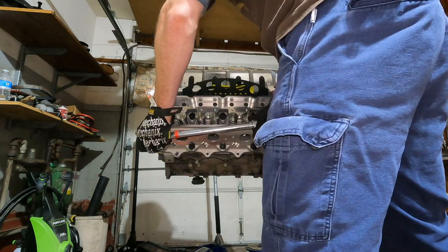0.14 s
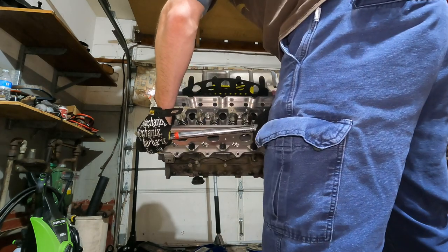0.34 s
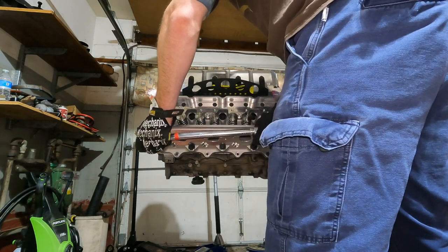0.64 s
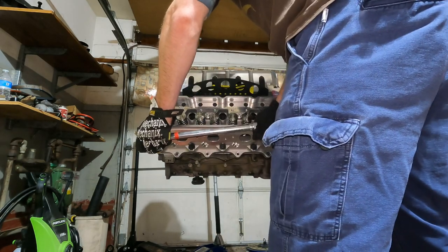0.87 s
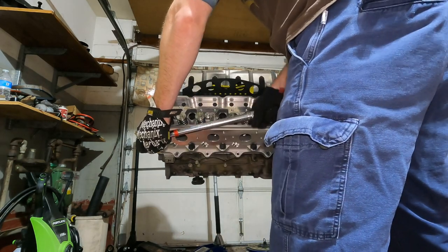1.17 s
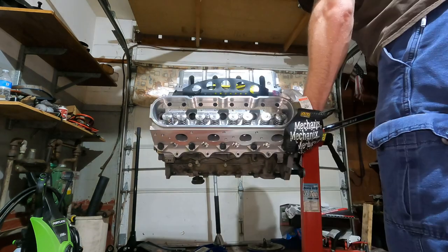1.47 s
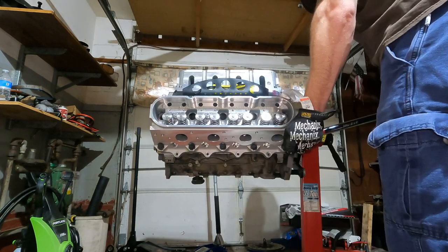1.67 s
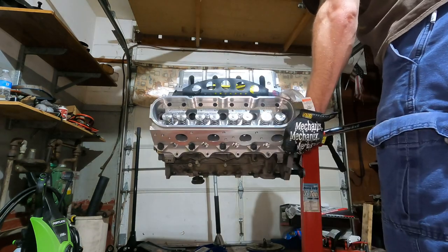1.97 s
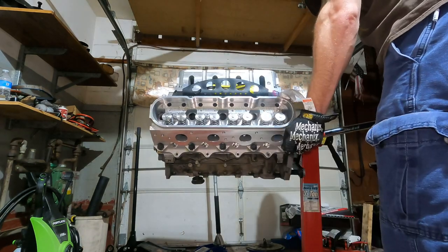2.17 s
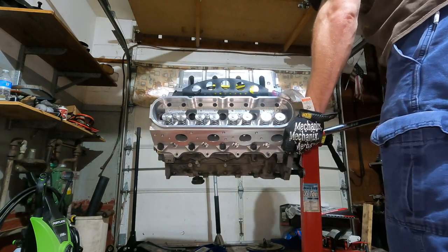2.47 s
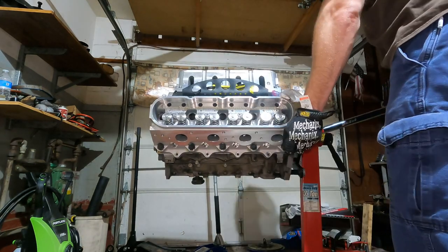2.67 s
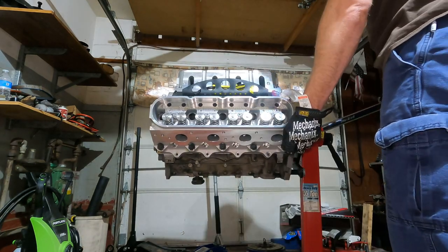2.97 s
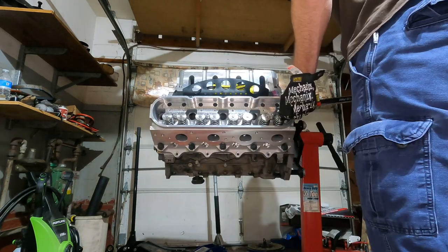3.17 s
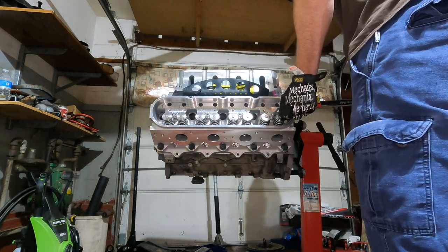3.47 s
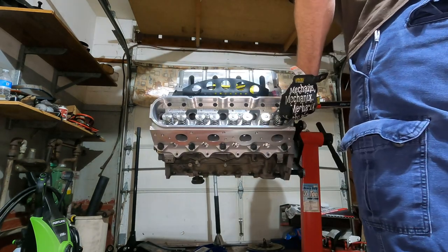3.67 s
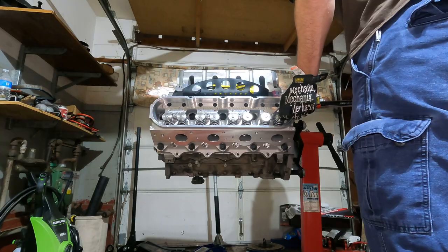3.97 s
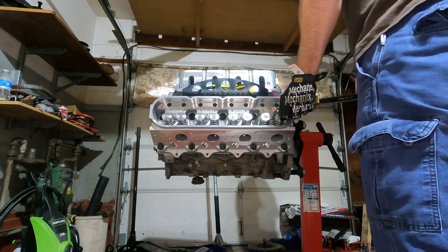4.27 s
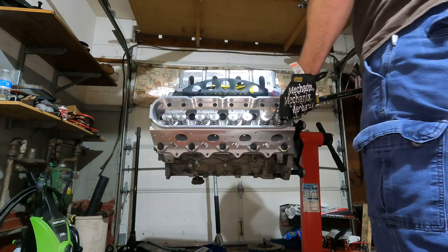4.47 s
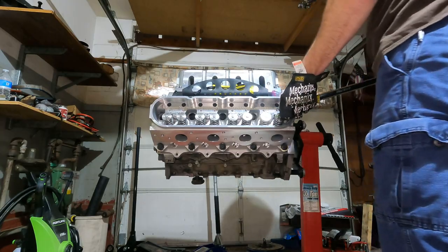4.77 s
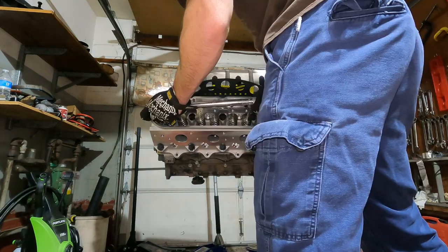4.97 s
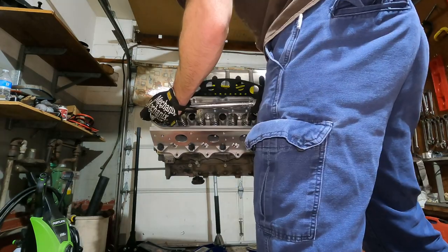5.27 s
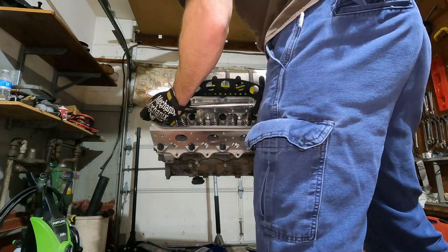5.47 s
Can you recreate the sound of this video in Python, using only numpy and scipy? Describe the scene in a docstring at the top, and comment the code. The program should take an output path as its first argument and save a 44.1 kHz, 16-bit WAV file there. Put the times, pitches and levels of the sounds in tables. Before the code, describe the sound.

Seven very loud, hard steel snaps from a torque wrench, alternating between long-ringing breaks and short, dead returns, with quiet gaps between. Near the end a loose socket ticks faintly, then knocks once more clearly. Dense short garage reflections follow each snap; the recorder squashes the start of the tails. Soft room noise and faint hum continue throughout, nearly mono.

```python
"""A click-type torque wrench tightens head bolts on an engine in a small garage.
At each bolt it breaks over with a loud snap, then snaps back as the pull is eased: noisy contact plus damped modes.
Long modes of tube, bolt and engine ring on; the loose socket knocks; soft room noise, hum and whine lie beneath.
The garage answers with dense reflections; the recorder adds faint pre-echoes of each snap,
and its limiter flattens the start of each tail."""
import sys
import numpy as np
from scipy import signal
from scipy.fft import rfft, irfft
from scipy.io import wavfile

SR = 44100
rng = np.random.default_rng(int(sys.argv[2]) if len(sys.argv) > 2 else 0)


def bounce(signal):
    """Save signal as a 16-bit WAV file at the path given by the first command-line argument."""
    frames = np.transpose(np.atleast_2d(signal))
    limited = np.clip(frames, -1, 1)
    pcm = np.round(limited * 32767).astype(np.int16)
    wavfile.write(sys.argv[1], SR, pcm)


N = 247842

# Snaps. Each row: start in seconds, stroke, direct level in dB (relative), socket note in Hz,
# tube and bolt ring in dB (relative).
SNAPS = [(0.4593, "break", 1.5, 4240, -1), (0.8682, "back", 1.5, 3620, -9), (2.0087, "break", 0.5, 4260, 1),
         (2.4463, "back", 1, 4390, 4), (3.556, "break", -1.5, 4210, 3), (4.0795, "back", -0.5, 4300, 0),
         (5.3301, "break", 2, 4280, 0)]
# By stroke: contact tilt in dB per octave; breaking over under load rings long, snapping back is brighter, deader.
CONTACT_TILT_DB_PER_OCTAVE = {"break": -0.2, "back": 0.33}
# By stroke: socket note in dB.
SOCKET_NOTE_DB = {"break": -8.5, "back": -13}
# By stroke: offset of the tube modes in dB.
TUBE_OFFSET_DB = {"break": -2.5, "back": -29}
# By stroke: offset of the bolt modes in dB.
BOLT_OFFSET_DB = {"break": -1, "back": -14}
# By stroke: later pre-echo in dB relative to the snap.
PRE_ECHO_REL_DB = {"break": -23, "back": -29}
# Socket knocks as it is lifted off the bolt. Each row: start in seconds, level in dB.
SOCKET_KNOCKS = [(4.762, -29), (4.817, -23), (4.8255, -22), (4.8291, -9.5)]
# Quickly damped ratchet head modes. Each row: frequency in Hz, T60 in seconds, relative level in dB
# breaking over, the same snapping back.
HEAD_MODES = [(1080, 0.035, -26.5, -19.5), (1587, 0.023, -25, -12.5), (1860, 0.022, -14, -15),
              (2019, 0.049, -12.5, -17), (2230, 0.014, -9, -24.5), (2850, 0.039, -16, -16),
              (3220, 0.013, -15, -9.5), (3595, 0.01, -15.5, -11.5), (4160, 0.04, -14.5, -12),
              (4450, 0.011, -15, -7), (4690, 0.022, -11, -8.5), (5230, .02, -17.5, -17.5),
              (6860, .012, -17, -18.5), (10160, .018, -16.5, -16.5), (11450, 0.021, -16.5, -26.5)]
# Steel tube modes. Each row: frequency in Hz, T60 in seconds, relative level in dB.
TUBE_MODES = [(3822, .95, -35), (4673, 0.8, -38), (5197, 0.75, -28), (5351, 2.3, -40.5)]
# Bolt modes. Each row: frequency in Hz, T60 in seconds, relative level in dB.
BOLT_MODES = [(4250, .55, -26), (4264, 1.1, -36)]
# Engine modes. Each row: frequency in Hz, T60 in seconds, relative level in dB.
ENGINE_MODES = [(742, .75, -42), (757, 0.65, -38.5), (885, 0.83, -43), (1420, .6, -43), (3850, 0.45, -28),
                (9630, 0.3, -37.5)]
# Steel-on-steel contact spectrum. Each row: frequency in Hz, gain in dB.
CONTACT_SPECTRUM = [(30, -41), (120, -21.5), (350, -14.5), (800, -19), (1300, -8), (1900, -1), (3200, 0.5),
                    (4700, -2.5), (5700, -11), (7200, -9), (8800, -23), (11000, -15), (13500, -27),
                    (16000, -42.5)]
# Garage decay. Each row: frequency in Hz, T60 in seconds.
GARAGE_DECAY = [(150, 0.12), (400, 0.39), (750, 0.58), (2000, 0.45), (4500, 0.42), (7500, 0.36),
                (13000, 0.27)]
# Garage colour. Each row: frequency in Hz, gain in dB.
GARAGE_COLOUR = [(60, -8.5), (300, 2), (700, 3.5), (1100, -2.5), (3000, -0.5), (5000, 0.5), (7500, -0.5),
                 (10500, -5.5), (13500, -6.5), (15000, -25)]
# Room noise spectrum. Each row: frequency in Hz, relative density in dB per Hz.
AIR_SPECTRUM = [(20, -23.5), (55, -14), (100, -15.5), (170, -6), (260, -8.5), (550, -12), (800, -13.5),
                (1500, -16.5), (3000, -22), (5500, -29), (7200, -35), (9000, -49.5), (10000, -46.5),
                (12500, -50), (14500, -72.5)]
# Faint hum and whine. Each row: frequency in Hz, rms level in dB before the waver.
AIR_TONES = [(160, -71), (8020, -92)]
# Stereo difference relative to the mid signal. Each row: frequency in Hz, level in dB.
SIDE_SPECTRUM = [(100, -23.5), (500, -27), (1200, -50.5), (2400, -39), (4000, -42), (8000, -35),
                 (10000, -19), (13000, -1)]


def gain_of(db):
    """Decibels to amplitude."""
    return 10 ** (np.asarray(db) / 20)


def evened(x):
    """Scales to rms 1."""
    return x / np.sqrt(np.mean(x ** 2) + 1e-20)


def read(points, hz):
    """Interpolates a table on a log-frequency axis."""
    point_hz, value = np.transpose(points)
    return np.interp(np.log(hz + 1), np.log(point_hz + 1), value)


def add(mix, start_s, sound):
    """Mixes a sound in at start_s, cut at the end of the mix."""
    part = mix[round(start_s * SR):][:len(sound)]
    part += sound[:len(part)]


def coloured(x, points, tilt_db_per_octave=0, size=2048, pivot_hz=3000):
    """Minimum-phase filter with the given spectrum, tilted about pivot_hz."""
    hz = abs(np.fft.fftfreq(size, 1 / SR))
    octaves = np.log2(np.maximum(hz / pivot_hz, 0.1))
    log_gain = np.log(gain_of(read(points, hz) + tilt_db_per_octave * octaves))
    taps = np.fft.ifft(np.exp(np.conj(signal.hilbert(log_gain)))).real
    return signal.fftconvolve(x, taps[:size // 2])[:len(x)]


def ring(modes, t):
    """Sum of exponentially dying sines of random phase, from rows of Hz, T60, dB."""
    total = np.zeros(len(t))
    for hz, t60_s, db in modes:
        total += gain_of(db - 60 * t / t60_s) * np.sin(2 * np.pi * (hz * t + rng.random()))
    return total


def air(noise_db=-58, waver_db=1.0):
    """Soft coloured room noise, hum and whine, wavering together by waver_db rms."""
    t = np.arange(N) / SR
    waver_hz = np.geomspace(0.5, 12, 20)
    waver = evened(sum(np.sin(2 * np.pi * (hz * t + rng.random())) for hz in waver_hz))
    noise = evened(coloured(rng.standard_normal(N), AIR_SPECTRUM, size=8192))
    tones = sum(gain_of(db) * np.sqrt(2) * np.sin(2 * np.pi * hz * t) for hz, db in AIR_TONES)
    return (gain_of(noise_db) * noise + tones) * gain_of(waver_db * waver)


def pre_echoes(snaps, spacing_s=0.0107, fainter_db=-13):
    """Two faint early copies of each snap's onset, spacing_s apart, from the recorder's processing."""
    out = np.zeros(N)
    for start_s, stroke, *_ in SNAPS:
        onset = snaps[round(start_s * SR):round((start_s + spacing_s) * SR)]
        copy = gain_of(PRE_ECHO_REL_DB[stroke]) * onset
        add(out, start_s - spacing_s, copy)
        add(out, start_s - 2 * spacing_s, gain_of(fainter_db) * copy)
    return out


def crack(t, t60_s, tilt_db_per_octave):
    """Steel parts chatter against each other: coloured random-sign noise, dying fast."""
    chatter = rng.choice([-1.0, 1.0], len(t)) * gain_of(-60 * t / t60_s)
    return coloured(chatter, CONTACT_SPECTRUM, tilt_db_per_octave)


def snap(stroke, note_hz, head_db=-3, note_t60_s=0.043, crack_t60_s=0.034,
         thud_db=-28, thud_hz=340, thud_t60_s=0.022, swell_s=0.00045):
    """The pawl cracks against the tube, rings head and socket, and thuds into the engine."""
    t = np.arange(SR // 10) / SR
    modes = [(hz, t60_s, back_db if stroke == "back" else break_db)
             for hz, t60_s, break_db, back_db in HEAD_MODES]
    head = gain_of(head_db) * ring(modes, t)
    note = ring([(note_hz, note_t60_s, SOCKET_NOTE_DB[stroke])], t)
    thud = gain_of(thud_db - 60 * t / thud_t60_s) * np.sin(2 * np.pi * thud_hz * t)
    swell = 1 - np.exp(-t / swell_s)  # modes take a cycle or so to build up
    contact = crack(t, crack_t60_s, CONTACT_TILT_DB_PER_OCTAVE[stroke])
    return contact + swell * (head + note) + thud


def garage(first_s=0.00089, build_s=0.0036, early_db=3, early_s=0.0067):
    """Dense random-sign reflections, first from the engine close by, then the walls, dying band by band."""
    t = np.arange(SR) / SR
    density_per_s = 7000 + 40000 * t
    taps = rng.standard_normal(SR) * (rng.random(SR) < density_per_s / SR)
    taps *= 1 - np.exp(-np.maximum(t - first_s, 0) / build_s)
    taps *= gain_of(early_db * np.exp(-t / early_s))
    hz, frame_s, bands = signal.stft(taps, SR, nperseg=256)
    decay = gain_of(-60 * frame_s / read(GARAGE_DECAY, hz)[:, None])
    tail = signal.istft(bands * decay, SR, nperseg=256)[1]
    return coloured(tail / np.linalg.norm(tail), GARAGE_COLOUR)


def wrench(near_db=1.5, wet_db=3.5, directions=4):
    """Same torque at each release, so the wall level is fixed; direct level varies with how it is held."""
    out = np.zeros(N)
    for start_s, stroke, direct_db, note_hz, _ in SNAPS:
        direct, *others = [snap(stroke, note_hz) for _ in range(directions + 1)]
        # another shape radiates in each direction
        walls = sum(signal.fftconvolve(shape, garage()) for shape in others) / np.sqrt(directions)
        add(out, start_s, gain_of(near_db + direct_db) * direct)
        add(out, start_s, gain_of(wet_db) * walls)
    return out


def ringing(engine_db=0.3):
    """Tube, bolt and engine ring for up to 1 s after a snap; the next one stops them."""
    out, t = np.zeros(N), np.arange(SR) / SR
    for start_s, stroke, _, _, ring_db in SNAPS:
        tube = gain_of(TUBE_OFFSET_DB[stroke]) * ring(TUBE_MODES, t)
        bolt = gain_of(BOLT_OFFSET_DB[stroke]) * ring(BOLT_MODES, t)
        engine = gain_of(engine_db) * ring(ENGINE_MODES, t)
        out[round(start_s * SR):] = 0
        add(out, start_s, engine + gain_of(ring_db) * (tube + bolt))
    return out


def socket(wet_db=-1, tilt_db_per_octave=1.6, tilt_per_db=0.2, body_db=-25, crack_t60_s=0.0055,
           echo_end_s=4.88):
    """Light knocks of the loose socket, the softer the duller; the wall echo stops at echo_end_s."""
    out, t = np.zeros(N), np.arange(SR // 10) / SR
    hardest_db = max(db for _, db in SOCKET_KNOCKS)
    for start_s, db in SOCKET_KNOCKS:
        contact = crack(t, crack_t60_s, tilt_db_per_octave + tilt_per_db * (db - hardest_db))
        body = ring([(1020, 0.015, body_db), (1800, 0.028, body_db)], t)
        add(out, start_s, gain_of(db) * (contact + body))
    walls = signal.fftconvolve(out, garage())[:N] * (np.arange(N) / SR < echo_end_s)
    return out + gain_of(wet_db) * walls


def scene():
    """Nearly mono: a quarter-cycle-shifted side signal, strong only in the high treble."""
    snaps = wrench()
    mid = air() + pre_echoes(snaps) + snaps + ringing() + socket()
    side_gain = gain_of(read(SIDE_SPECTRUM, np.fft.rfftfreq(2 * N, 1 / SR)))
    side = irfft(1j * rfft(mid, 2 * N) * side_gain)[:N]
    return np.array([mid + side, mid - side])


def record(dry, threshold_db=-17, slope=0.71, attack_s=0.0055, recovery_db_per_s=125,
           full_scale=1.15, low_cut_hz=50, high_cut_hz=15700):
    """A limiter clamps down just after each snap and recovers; peaks round off; then the band limits."""
    r = np.exp(-1 / (attack_s * SR))
    smooth = [1 - r], [1, -r]
    power_db = 10 * np.log10(signal.lfilter(*smooth, (dry ** 2).mean(0)) + 1e-12)
    fall_db = np.arange(N) * recovery_db_per_s / SR
    held_db = np.maximum.accumulate(power_db + fall_db) - fall_db
    over_db = np.maximum(held_db - threshold_db, 0)
    limited = dry * gain_of(-slope * signal.lfilter(*smooth, over_db))
    # the first milliseconds slip past the limiter
    rounded = full_scale * np.tanh(limited / full_scale)
    high_pass = signal.butter(2, low_cut_hz, "high", fs=SR, output="sos")
    low_pass = signal.firwin(151, high_cut_hz, window=("kaiser", 9), fs=SR)
    return signal.oaconvolve(signal.sosfilt(high_pass, rounded), low_pass[None], "same")


dry = scene()
out = record(dry)
bounce(out)
```